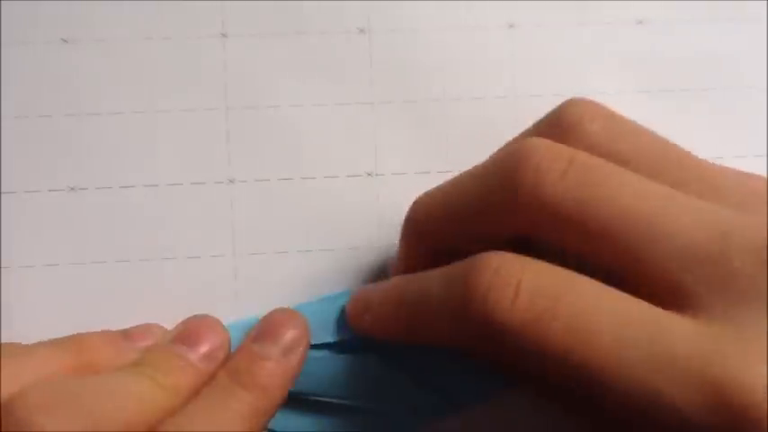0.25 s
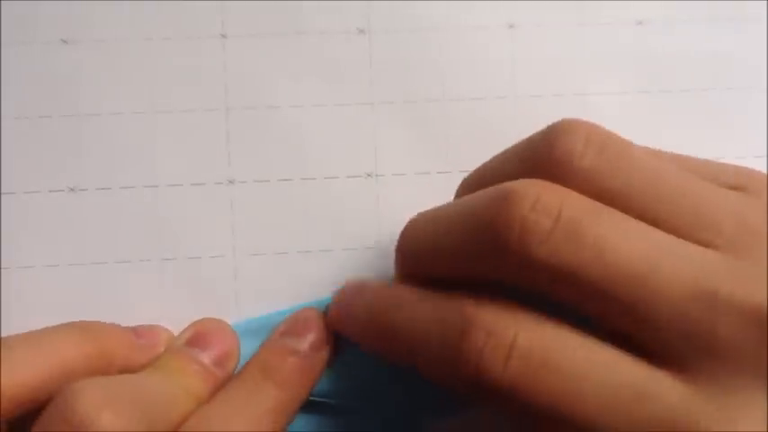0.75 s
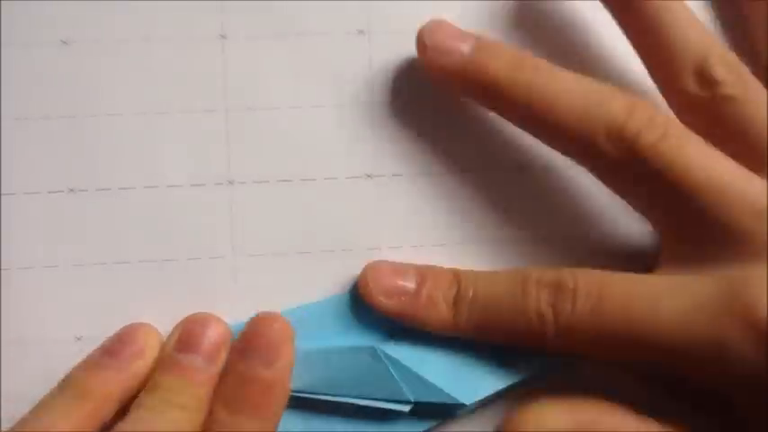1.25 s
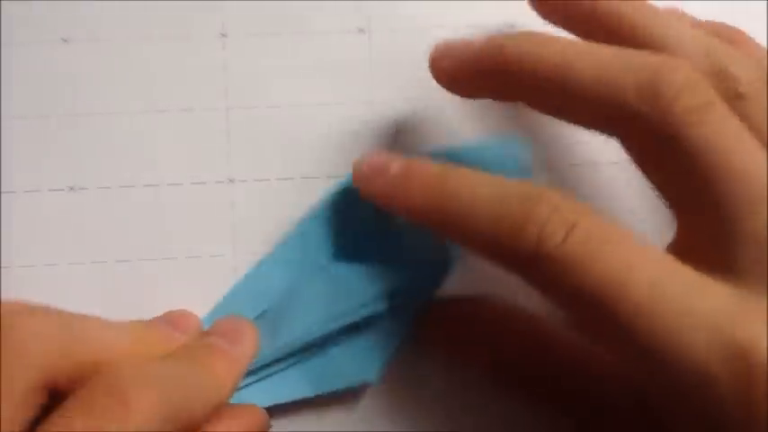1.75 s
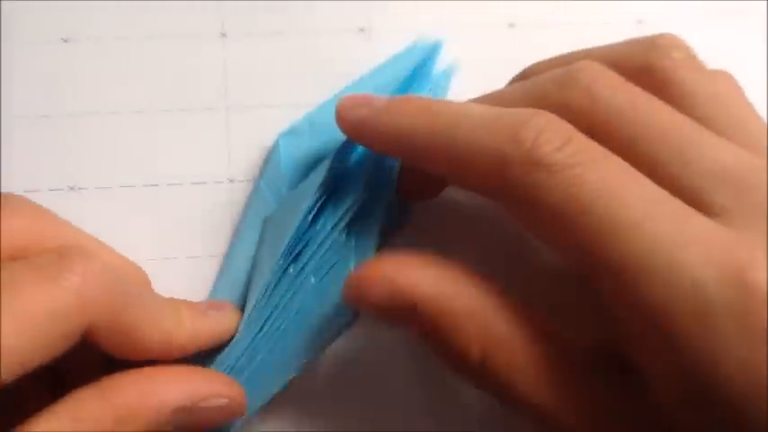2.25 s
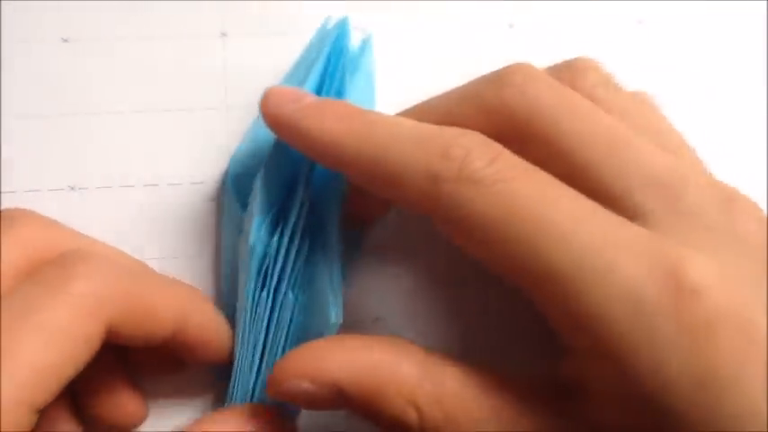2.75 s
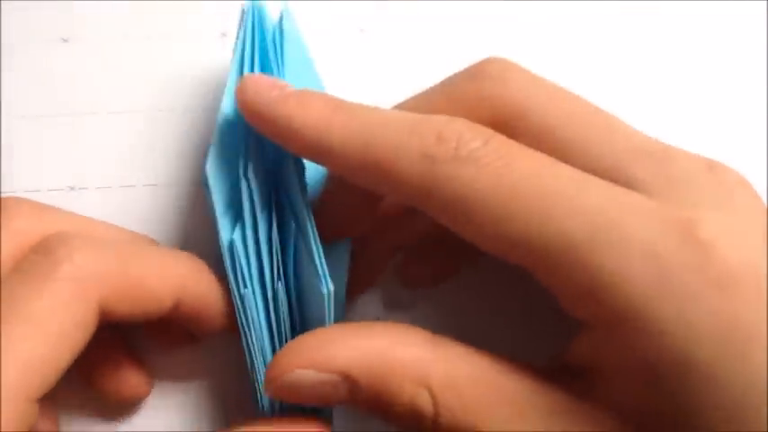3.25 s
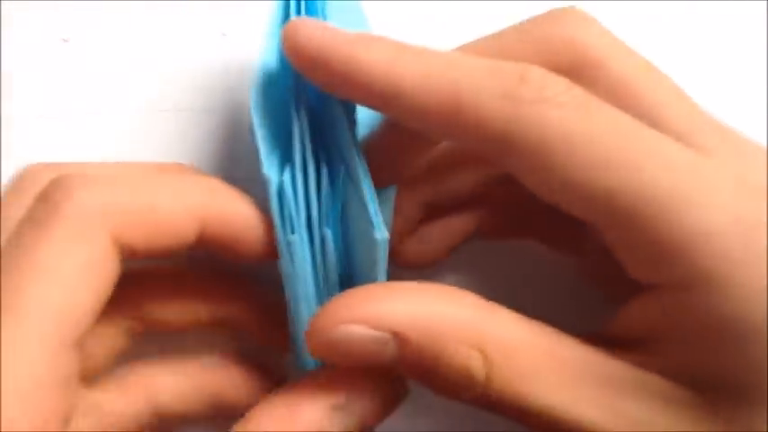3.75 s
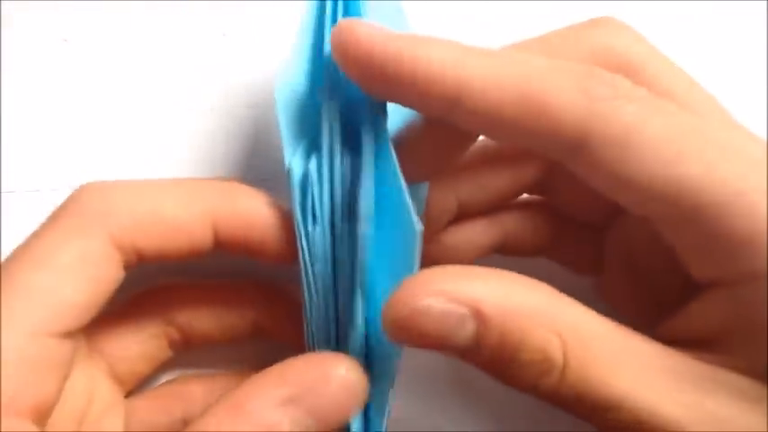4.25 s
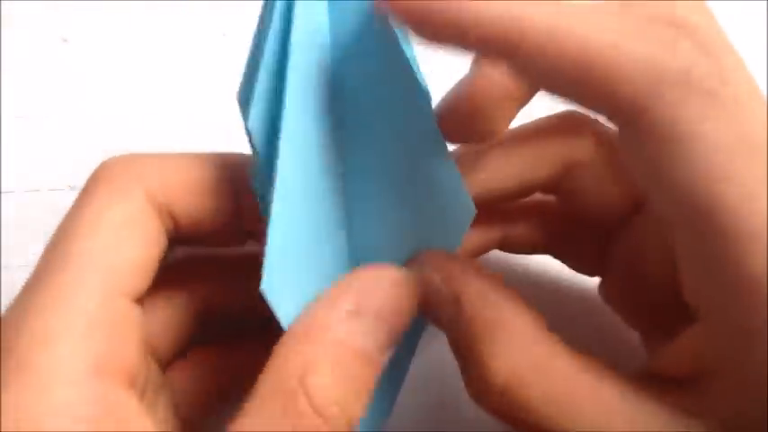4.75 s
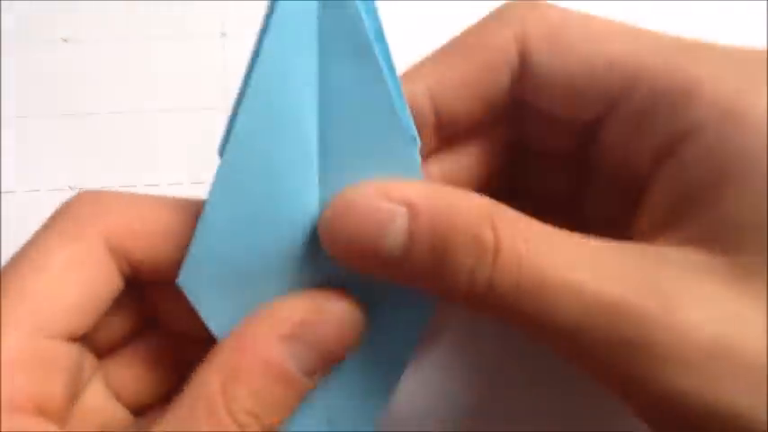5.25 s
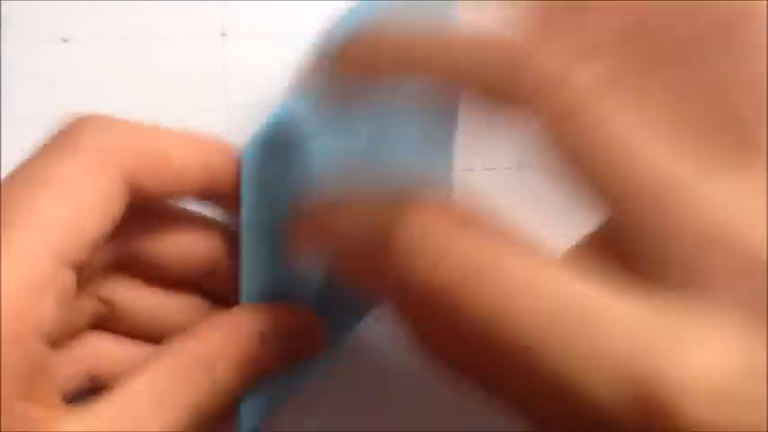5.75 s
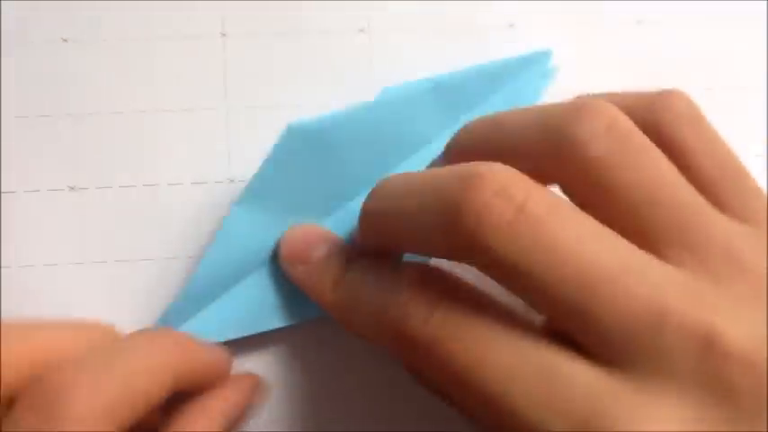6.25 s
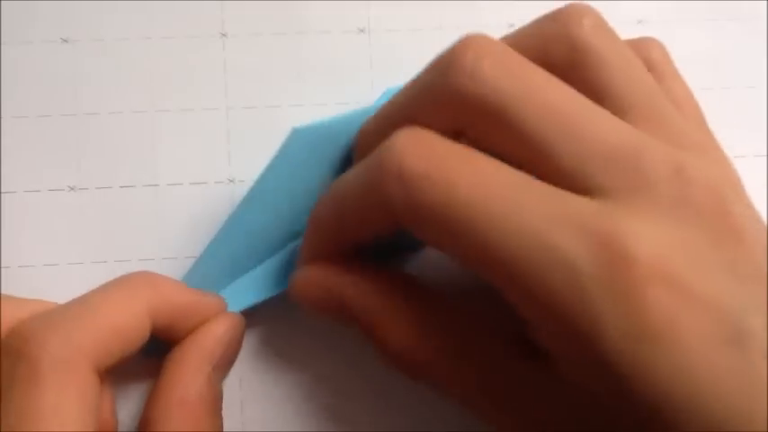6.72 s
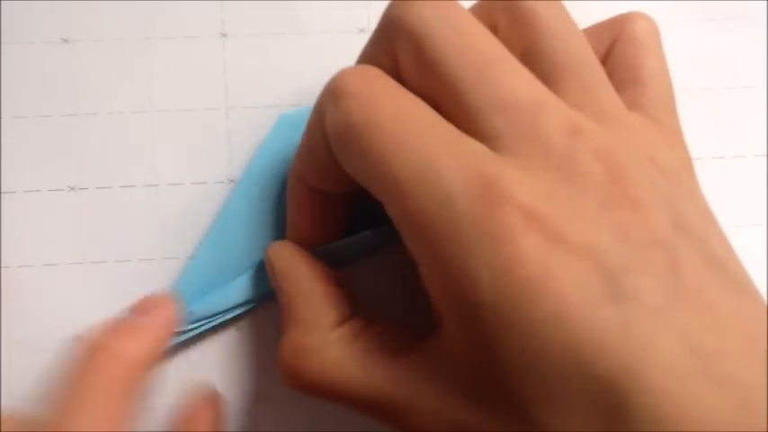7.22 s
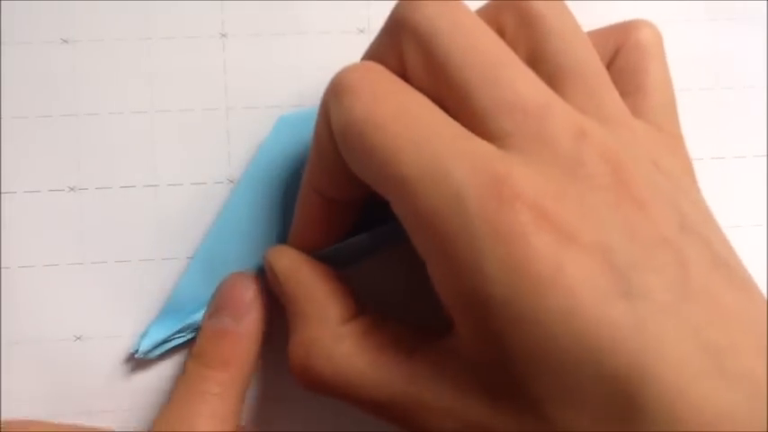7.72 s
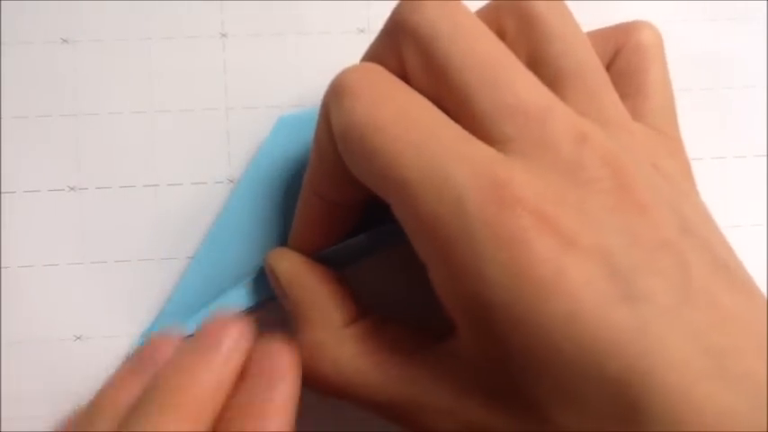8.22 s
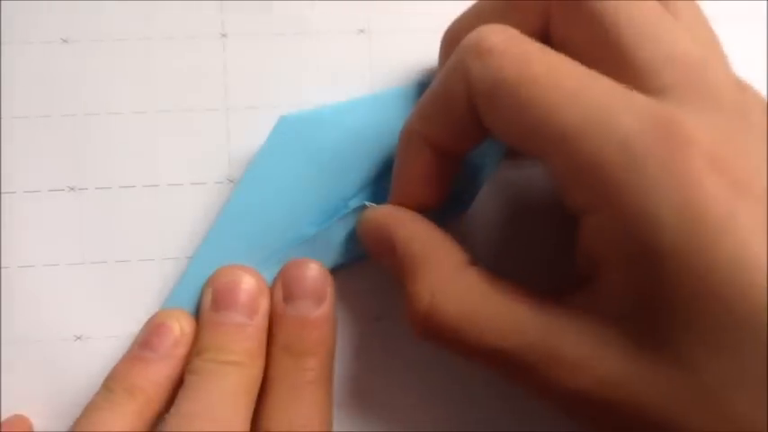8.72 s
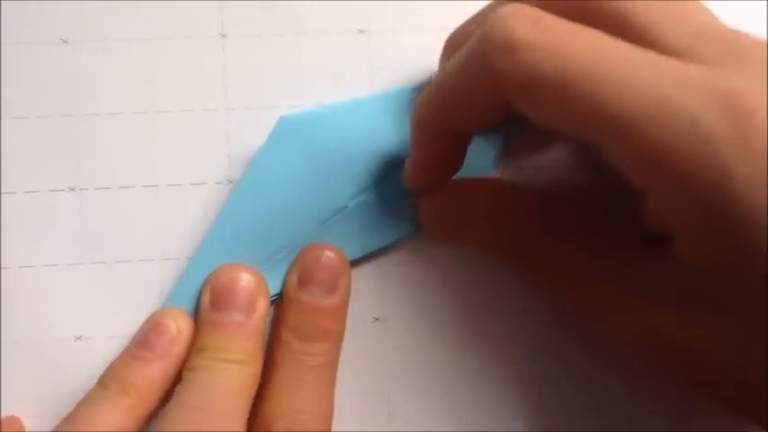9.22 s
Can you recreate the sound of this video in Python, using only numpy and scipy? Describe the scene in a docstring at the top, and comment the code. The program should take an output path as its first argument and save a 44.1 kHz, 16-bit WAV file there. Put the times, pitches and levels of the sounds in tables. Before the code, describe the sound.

Stiff paper is folded by hand up close: two loud sharp snaps early, then scattered crackles, grainy rustling and hollow desk bumps near the end.

```python
"""Folded paper buckles in sharp snaps: each is a click of one facet blended with a burst of small slips.
Around the snaps, fingers and layers slide with a grainy rustle of modulated noise and tiny crinkles.
Hands bump a desk top, ringing its modes with a hollow sound; swelling low noise makes soft hand drags
on the desk and the short dull thuds under some snaps. Sliding flaps sing in narrow bands of noise.
It is heard close to one microphone in a quiet room, with a faint diffuse tail and steady hiss."""
import sys
import numpy as np
from scipy import signal
from scipy.fft import rfft, irfft
from scipy.io import wavfile
from scipy.ndimage import uniform_filter1d

SR = 44100
rng = np.random.default_rng(int(sys.argv[2]) if len(sys.argv) > 2 else 0)


def persist_wave(psi):
    """Save psi, clipped to +-1, as 16-bit WAV."""
    counts = np.round(np.clip(psi, -1, 1) * 32767).astype(np.int16)
    wavfile.write(sys.argv[1], SR, np.atleast_2d(counts).T)


N = 418068
EDGE_HZ = 15400  # upper band limit of the microphone channel


def amp(db):
    """Amplitude ratio: 20 dB for each factor of ten."""
    return 10 ** (np.asarray(db) / 20)


def unit_rms(x):
    """Normalisation by mean power: scales to a mean square of one."""
    return x / np.sqrt(np.mean(x ** 2) + 1e-20)


def unit_energy(x):
    """Normalisation by total energy: scales to a sum of squares of one."""
    return x / (np.linalg.norm(x) + 1e-20)


def read(points, hz):
    """Linear interpolation of a spectrum along a logarithmic frequency axis."""
    point_hz, value = np.transpose(points)
    return np.interp(np.log(hz + 1), np.log(point_hz + 1), value)


def add(mix, start_s, sound):
    """Superposition: adds a sound into the mix, in place, from a start time."""
    part = mix[max(round(start_s * SR), 0):][:len(sound)]
    part += sound[:len(part)]


def smooth(x, *sizes, axis=-1):
    """Low-pass smoothing by successive moving averages."""
    for size in sizes:
        x = uniform_filter1d(x, size=size, axis=axis)
    return x


def noise(spectrum):
    """Spectral shaping: white noise filtered to a given colour, at unit power."""
    white = rfft(rng.standard_normal(N))
    gain = amp(read(spectrum, np.fft.rfftfreq(N, 1 / SR)))
    return unit_rms(irfft(white * gain, N))


def sliding(t):
    """Incoherent strokes add in power: gives level (dB) and power-weighted brightness (dB/octave) at t."""
    # strokes of a finger or a layer over the paper; level_db is the level before attack and sag
    # columns: start_s, length_s, level_db, brightness_db_per_octave
    strokes = [(-0.087, 0.23, -49.5, 0.5), (0.046, 0.04, -42, 0.5), (0.337, 0.065, -54, 0.5),
               (0.559, 0.022, -54, -5), (0.72, 0.061, -52.5, -2.5), (0.875, 0.045, -55, -1.5),
               (0.98, 0.21, -47.5, 2.5), (1.178, 0.13, -50.5, 0), (1.548, 0.049, -59.5, -1.0),
               (1.564, 0.43, -61.0, -0.5), (2.068, 0.23, -56.0, -3.5), (2.313, 0.28, -61.5, -1.5),
               (2.634, 0.033, -56, -2.5), (2.748, 0.221, -55.0, -1.5), (3.053, 0.057, -58, -2),
               (3.225, 0.08, -55.5, -1), (3.359, 0.18, -54.5, -5.5), (3.611, 0.032, -53, -2.5),
               (3.768, 0.065, -61, -4.5), (4.012, 0.041, -60, 0), (4.187, 0.022, -57.5, -2),
               (4.29, 0.1, -57.5, -2), (4.4, 0.064, -50.5, 0.5), (4.472, 0.06, -45, -2.5),
               (4.574, 0.074, -54.5, -1), (4.679, 0.02, -47, -1.5), (4.749, 0.088, -51.0, 2),
               (4.796, 0.29, -55.0, -1.5), (4.989, 0.071, -48.5, 2.0), (5.156, 0.096, -57.5, -4),
               (5.335, 0.12, -47.5, 0.5), (5.358, 0.32, -54, 0), (5.755, 0.16, -44.5, -3),
               (5.912, 0.1, -42.5, -1.5), (6.049, 0.12, -46.5, -3.5), (6.164, 0.071, -42, 0),
               (6.39, 0.055, -44, 0.5), (6.464, 0.07, -47.5, -0.5), (6.546, 0.096, -51.5, -1.5),
               (6.654, 0.023, -46.5, -1.0), (6.854, 0.015, -54.5, -1.5), (6.909, 0.13, -61.5, -2.5),
               (7.085, 0.15, -53, 0.5), (7.219, 0.033, -50, 5.5), (7.418, 0.007, -52.5, 1.5),
               (7.784, 0.34, -60.5, -3), (8.12, 0.02, -47, -2.5), (8.163, 0.083, -51, -0.5),
               (8.426, 0.16, -46, -0.5), (8.93, 0.056, -54.5, -1.5), (9.037, 0.041, -51.5, -3),
               (9.153, 0.035, -48.5, -4.5), (9.2, 0.087, -52.5, -2.5), (9.4, 0.073, -56.5, -4.0)]
    attack_share, sag_db, release_s = 0.44, -2, 0.023  # attack is a share of the stroke's length
    # between strokes the fingers never quite rest
    resting_db, resting_db_per_octave = -69, -3.5

    power = amp(resting_db) ** 2 + np.zeros(len(t))
    weighted_tilt = resting_db_per_octave * power
    for start, length, db, bright in strokes:
        along = np.clip((t - start) / length, 0, 1)
        attack = np.minimum(along / attack_share, 1)
        release = np.exp(-np.maximum(t - start - length, 0) / release_s)
        stroke = (attack * amp(db + sag_db * along) * release) ** 2
        power = power + stroke
        weighted_tilt = weighted_tilt + bright * stroke
    return 10 * np.log10(power), weighted_tilt / power


def rustle(grain_db=3.5, flutter_db=2.0, patchy_db=3.5, scoop_db=1.04):
    """Stick-slip friction: fibres catch and let go as noise; the strokes set its level and colour."""
    # relative colour of sliding paper; columns: frequency_hz, density_db (per Hz)
    paper_colour = [(40, -47), (110, -46), (200, -10.5), (400, -14.5), (650, -14.5), (1100, -7.5),
                    (1600, 0.5), (2200, -0.5), (4000, 4), (6500, 5), (9500, 2.5), (14500, -0.5),
                    (16000, -10)]
    flutter = unit_rms(smooth(rng.standard_normal(N), 260))
    catches = rng.standard_normal(N)
    grain = unit_rms(smooth(rng.standard_normal(N), 14))
    catches = catches * amp(grain_db * grain + flutter_db * flutter)

    hz, t, z = signal.stft(unit_rms(catches), SR, nperseg=512)
    level, bright = sliding(t)
    octave = np.log2(np.clip(hz, 1000, 14000) / 4000)[:, None]
    # the mid-range is slightly scooped: scoop_db is per octave squared
    colour = amp(read(paper_colour, hz)[:, None] + octave * bright + octave ** 2 * scoop_db)
    # the sheet's resonances shift as fingers bend it
    patches = smooth(rng.standard_normal(z.shape), 7, axis=0)
    patches = unit_rms(smooth(patches, 5, axis=1))
    colour = colour * amp(patchy_db * patches) * (hz < EDGE_HZ + 500)[:, None]
    # unit power in every frame leaves loudness to the strokes
    colour = colour / np.sqrt(np.mean(colour ** 2, axis=0))
    grains = signal.istft(z * colour, SR, nperseg=512)[1][:N]
    return grains * amp(np.interp(np.arange(N) / SR, t, level))


def air(level_db=-63):
    """Stationary background noise: room air and microphone hiss."""
    # relative colour of the hiss; columns: frequency_hz, density_db (per Hz)
    hiss_colour = [(20, -30.5), (60, -21), (95, -16), (125, -5), (200, 0), (280, -4.5), (380, -2.5),
                   (560, -8.5), (1000, -11.5), (2400, -14.5), (9000, -12.5), (15000, -12.5)]
    return amp(level_db) * noise(hiss_colour)


def facet(hz, rise_db, fall_db, uneven_db=2.5, ringing=0.22, width=0.13, size=1024):
    """Minimum-phase impulse response of one facet: a broad hump at its pitch, rippled by its own modes."""
    # the hollow folded model colours every snap; columns: frequency_hz, gain_db
    body = [(60, -31), (250, 9), (850, -3), (1450, 4), (2200, 0), (10000, 3), (15500, -1)]
    f = np.fft.rfftfreq(size, 1 / SR)
    octave = np.log2((f + 20) / hz)
    hump = (amp(-rise_db * octave) ** 2 + amp(fall_db * octave) ** 2) ** -.5
    # a taut facet, steep on both sides, also rings for a few cycles at its pitch
    tone_db = ringing * max(min(rise_db, fall_db), 0) * np.exp(-(octave / width) ** 2)
    modes = unit_rms(smooth(rng.standard_normal(len(f)), 6, 5))
    gain = hump * amp(read(body, f) + tone_db + uneven_db * modes)
    log_gain = np.maximum(np.log(gain), -10)
    # the Hilbert transform of the log gain supplies the causal phase
    circle = np.r_[log_gain, log_gain[-2:0:-1]]
    return np.fft.ifft(np.exp(np.conj(signal.hilbert(circle)))).real[:size // 2]


def snap(hz, rise_db, fall_db, give_s, clean_s=0.00061, ring_s=0.0014, stretch=0.89, swell=0.57, size=1024):
    """Snap-through buckling: a fast fold clicks cleanly, a slow one swells through many small slips."""
    t, give_s = np.arange(size) / SR, give_s + 1 / SR
    click = facet(hz, rise_db, fall_db)
    decay = np.exp(-t / (ring_s + stretch * give_s))
    onset = 1 - np.exp(-t / (swell * give_s))
    slips = rng.laplace(size=size) * decay * onset
    # energy share of the slips; it is half when give_s equals clean_s
    share = give_s ** 2 / (give_s ** 2 + clean_s ** 2)
    sound = np.sqrt(share) * unit_energy(signal.fftconvolve(slips, click))
    sound[:len(click)] += np.sqrt(1 - share) * unit_energy(click)
    return unit_energy(sound)


def crinkles(per_s=60, crowding=0.4, firm_db=-55, base_db=3, follow=0.75, spread_db=3.5, pitch_hz=4300, count=1500):
    """A thinned random point process: tiny buckles, stronger and more crowded in firm handling."""
    draws, out = rng.random((count, 4)), np.zeros(N)
    times = draws[:, 0] * N / SR
    levels = sliding(times)[0]
    for start, level, (keep, strength, pitch) in zip(times, levels, draws[:, 1:]):
        # per_s is the expected rate when the sliding level equals firm_db
        rate = per_s * amp(crowding * (level - firm_db))
        if keep < rate * N / SR / count:
            hz = pitch_hz * 2 ** (1.4 * (2 * pitch - 1))  # within 1.4 octaves either way
            tick = snap(hz, rise_db=9, fall_db=7.5, give_s=0.00042)
            db = base_db + follow * level - spread_db * np.log(strength + 0.029)
            add(out, start, amp(db) * tick)
    return out


def snaps(rise_db_per_octave=10.5, rise_at_hz=2080, rise_power=0.42):
    """Radiation efficiency: facets radiate less below their pitch, and low ones lose bass fastest."""
    # distinct buckles of the sheet: facet pitch, fall above it, and time the fold takes to give
    # columns: start_s, energy_db, pitch_hz, fall_db_per_octave, give_s
    buckles = [(0.067, -6.5, 3100, 10, 0.00016), (0.1884, -10, 4000, 29, 0.00037),
               (0.2284, -25, 10000, 18, 0.0023), (0.3615, -20.5, 12000, 25, .001),
               (0.4826, -14, 3000, 14, 0.00054), (0.568, -19, 1460, 1.5, 0.0064),
               (0.7557, -12.5, 1510, 8.5, 0.00039), (0.9795, -24.5, 12000, 12, .0002),
               (1.137, 7, 3170, 10.5, 0.000086), (1.2775, 4, 7660, 14.5, 0.0002),
               (1.3928, -26, 5030, 3, .0005), (2.1707, -17.5, 1500, 1.5, .0009),
               (2.3236, -19.5, 1900, 3, 0.0047), (2.7753, -25.5, 5200, 8, 0.00038),
               (3.456, -11.5, 1510, 6, 0.0021), (3.463, -14.5, 796, 3.5, 0.0011),
               (3.5304, -21, 2270, 23, 0.00035), (3.6561, -17, 1400, 0.5, .0003),
               (3.7718, -26.5, 1610, 18, 0.00047), (3.8488, -22, 1700, 0, 0.00039),
               (4.035, -21.5, 1000, 0, 0.00023), (4.05, -13.5, 1100, 1, 0.0017),
               (4.054, -11, 12000, -5.5, 0.0013), (4.2962, -26.5, 1200, 3.5, 0.00076),
               (4.388, -21, 7250, 11, 0.00044), (4.4, -10, 8200, 16, 0.001),
               (4.423, -20.5, 8800, 25, 0.00037), (4.4572, -18.5, 1200, 1.5, 0.00057),
               (4.468, -21, 1400, 4.5, 0.00034), (4.485, -8, 7800, 4, 0.00044),
               (4.5322, -4, 1900, -1, 0.000096), (4.7523, -21, 12000, 3, 0.0011),
               (4.8197, -10.5, 666, 1.5, 0.00041), (4.885, -19, 900, 5, .0015),
               (4.917, -24, 11000, 4, 0.00035), (4.9513, -10, 980, 8, 0.000078),
               (5.0451, -20, 12000, 2, 0.00016), (5.0552, -10, 4900, 4.5, 0.00041),
               (5.0605, -5, 11000, 1, 0.00076), (5.1782, -10.5, 9700, 9, .00023),
               (5.2187, -24, 5000, 12, .0003), (5.24, -24, 2160, 16, 0.00069),
               (5.2549, -19.5, 2500, 0.5, 0.0002), (5.2633, -23, 3180, 14, 0.00031),
               (5.2762, -20.5, 2340, 2, 0.00017), (5.51, -18.5, 780, 2, 0.00015),
               (5.54, -20.5, 12000, 17, 0.00012), (5.5545, -24.5, 1190, 6.5, .0004),
               (5.6244, -22.5, 1330, 22, .0013), (5.655, -10, 1200, 3, 0.00018),
               (5.8793, -9, 1000, 3.5, 0.00014), (5.916, -13.5, 3800, 17, 0.00015),
               (6.0342, -14, 4130, 28, 0.00014), (6.1367, -12, 1310, 1, 0.00073),
               (6.181, -8, 1410, 2, 0.0023), (6.1928, -23, 2180, 14, 0.00057),
               (6.2076, -10, 1600, 5.5, 0.0024), (6.2829, -19, 7460, 13, 0.00022),
               (6.3232, -17, 4800, 18, 0.00039), (6.386, -20, 9700, 25, 0.00046),
               (6.5612, -18, 8660, 24, 0.0021), (6.5922, -15, 3770, 17, 0.004),
               (6.6024, -22, 1520, 15, 0.0025), (6.6889, -16, 1900, 9.5, 0.00074),
               (7.0292, -27.5, 5500, 13, .0002), (7.0529, -24.5, 950, 1.5, .001),
               (7.108, -22.5, 12000, -2, .0003), (7.1883, -10.5, 4240, 14.5, 0.001),
               (7.2097, -18.5, 12000, 32, 0.00022), (7.8532, -19.5, 494, 4.5, 0.00071),
               (8.0024, -26, 12000, 11, 0.00018), (8.1466, -12, 600, 0, 0.0004),
               (8.2065, -4.5, 834, 3, 0.0012), (8.2086, -2, 7500, 11, 0.00076),
               (8.3138, -28.5, 1700, 7, 0.00037), (8.3428, -24, 8600, 28, .0006),
               (8.937, -20.5, 700, 2.5, .0006), (8.9621, -12.5, 1700, 8.5, .00016),
               (8.9783, -5, 6100, 11.5, 0.00018), (9.1162, -20, 1680, 9.5, 0.00044)]
    out = np.zeros(N)
    for start, db, hz, fall_db, give_s in buckles:
        rise_db = rise_db_per_octave * (rise_at_hz / hz) ** rise_power
        add(out, start, amp(db) * snap(hz, rise_db, fall_db, give_s))
    return out


def drags_and_thuds():
    """Amplitude modulation: coloured noise under bell-shaped envelopes, long for drags, short for thuds."""
    # soft hand drags on the desk, and the short dull thuds under some snaps
    # columns: middle_s, level_db, spread_s (standard deviation of the Gaussian)
    swells = [(0.323, -57, 0.028), (0.412, -61, 0.043), (0.917, -65.5, 0.024), (4.488, -52, 0.0022),
              (4.956, -54, 0.0056), (5.061, -46.5, 0.0052), (5.99, -69, 0.073), (7.13, -65, 0.1),
              (8.213, -43, 0.0042), (8.943, -58.5, 0.036), (9.2, -53, 0.01), (9.316, -58, 0.013)]
    # relative colour of drags and thuds; columns: frequency_hz, density_db (per Hz)
    dull_colour = [(25, -22), (80, -36), (130, -1), (195, 5), (390, 1.5), (520, -12.5), (3000, -30)]
    t = np.arange(N) / SR
    envelope = sum(amp(db) * np.exp(-((t - middle) / spread) ** 2 / 2) for middle, db, spread in swells)
    return noise(dull_colour) * envelope


def desk(lowest_hz=150):
    """Modal excitation: a soft push with a short scuff rings the decaying modes of the desk top."""
    # hands landing; contact_s is the scuff's decay time, corner_hz the softness of the touch
    # columns: start_s, energy_db, contact_s, corner_hz
    landings = [(1.138, -31.5, 0.0027, 790), (1.349, -27.5, 0.037, 148), (3.457, -30, 0.0038, 503),
                (5.975, -22.5, 0.052, 596), (7.855, -21.5, .005, 900), (8.145, -22.5, 0.02, 800),
                (8.21, -16, 0.0064, 700), (8.925, -19.5, 0.043, 450), (9.170, -11, 0.0057, 800),
                (9.186, -10.5, .005, 450), (9.212, -18, 0.0096, 700), (9.266, -22.5, 0.041, 900),
                (9.431, -17.5, 0.0043, 1100), (9.442, -14.5, 0.013, 500)]
    # relative modes of the desk top; columns: frequency_hz, amplitude_db, t60_s
    desk_modes = [(206, 4.5, 0.13), (373, -1.5, .1), (389.7, 10, .14), (464, -5, .083), (568, -9.5, 0.19),
                  (647, -12, 0.085), (892, -4, .057), (972, -10, .078), (1340, 4, .048)]
    t, out = np.arange(SR // 3) / SR, np.zeros(N)
    ring = sum(amp(db - 60 * t / t60) * np.cos(2 * np.pi * hz * t) for hz, db, t60 in desk_modes)
    # below its first mode the desk hardly radiates
    ring = signal.sosfilt(signal.butter(4, lowest_hz, "high", fs=SR, output="sos"), ring)
    for start, db, contact, corner_hz in landings:
        force = unit_energy(rng.standard_normal(len(t)) * np.exp(-t / contact))
        force[0] += 1  # the push itself
        force = signal.sosfilt(signal.butter(2, corner_hz, fs=SR, output="sos"), force)
        bump = unit_energy(signal.fftconvolve(force, ring)[:len(t)])
        add(out, start, amp(db) * bump)
    return out


def flaps(width=0.4):
    """Cavity resonance: paper sliding on paper excites the narrow pocket between the layers."""
    # flaps sliding out from between their neighbours; spread_s is the Gaussian's standard deviation
    # columns: middle_s, level_db, spread_s, pitch_hz
    slides = [(1.726, -63.5, 0.1, 3920), (2.971, -56, 0.012, 4800), (3.254, -50.5, 0.018, 2480),
              (3.368, -58.5, 0.036, 2420)]
    t, out = np.arange(N) / SR, np.zeros(N)
    for middle, db, spread, hz in slides:
        pocket = signal.butter(2, [hz / (1 + width), hz * (1 + width)], "band", fs=SR, output="sos")
        slips = rng.standard_normal(N) ** 5  # the power makes the noise spiky
        envelope = amp(db) * np.exp(-((t - middle) / spread) ** 2 / 2)
        out += unit_rms(signal.sosfilt(pocket, slips)) * envelope
    return out


def room(x, onset_s=0.0012):
    """Diffuse reverberation: convolution with a decaying noise tail whose treble dies first."""
    # room decay; columns: frequency_hz, t60_s
    decay_times = [(200, 0.42), (1500, 0.21), (5000, 0.16), (14000, .13)]
    hz, t, z = signal.stft(rng.standard_normal(SR // 2), SR, nperseg=256)
    decay = amp(-60 * t / read(decay_times, hz)[:, None])
    tail = signal.istft(z * decay, SR, nperseg=256)[1]
    tail = tail * (1 - np.exp(-(np.arange(len(tail)) / SR / onset_s) ** 2))
    return signal.fftconvolve(x, unit_energy(tail))[:N]


def scene(room_db=-19):
    """Superposition at one microphone: direct sound, room tail and hiss, alike in both channels."""
    near = snaps() + rustle() + flaps() + crinkles() + desk() + drags_and_thuds()
    mono = near + amp(room_db) * room(near) + air()
    return np.array([mono, mono])


def record(dry):
    """Band limitation: a linear-phase low-pass filter sets the microphone channel's upper edge."""
    lowpass = signal.firwin(301, EDGE_HZ, window=("kaiser", 8), fs=SR)
    return signal.oaconvolve(dry, lowpass[None], "same", axes=1)


dry = scene()
out = record(dry)
persist_wave(out)
```